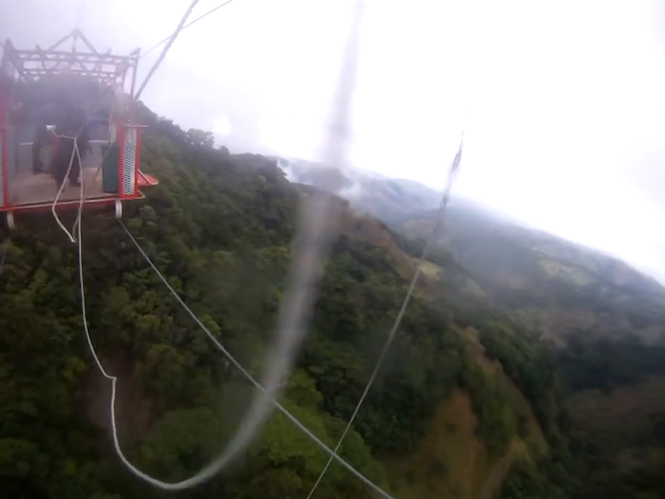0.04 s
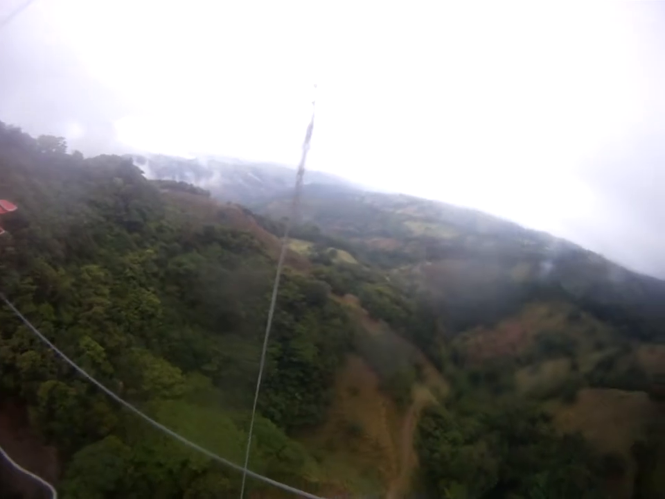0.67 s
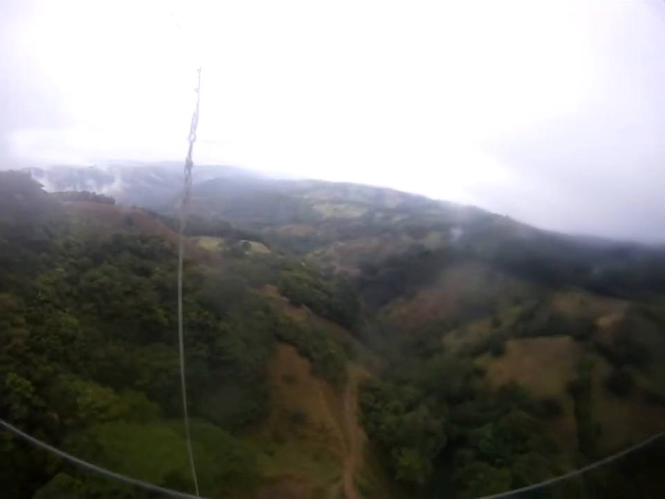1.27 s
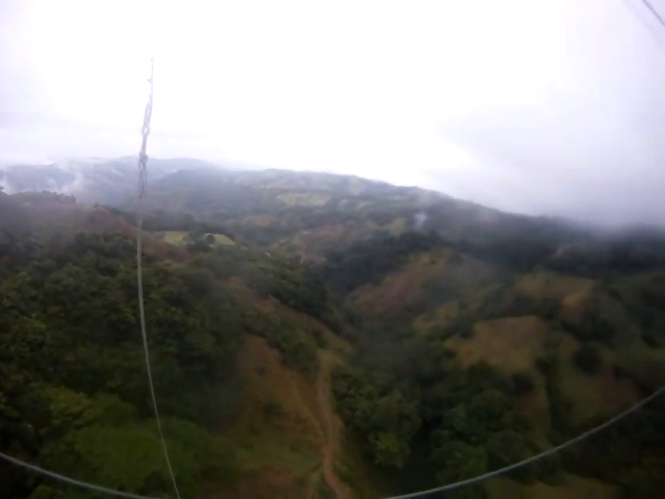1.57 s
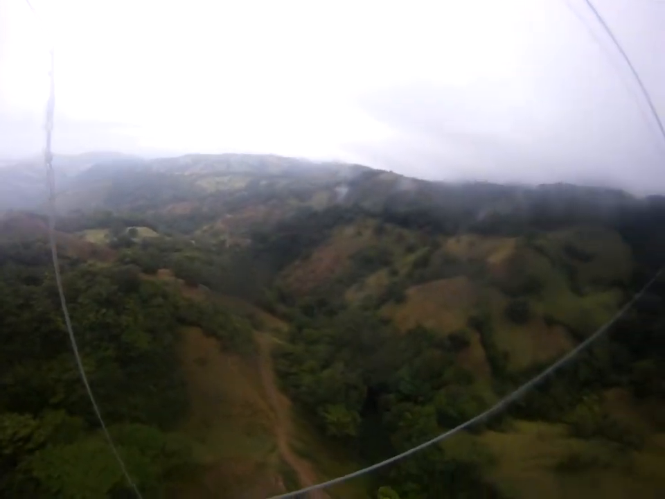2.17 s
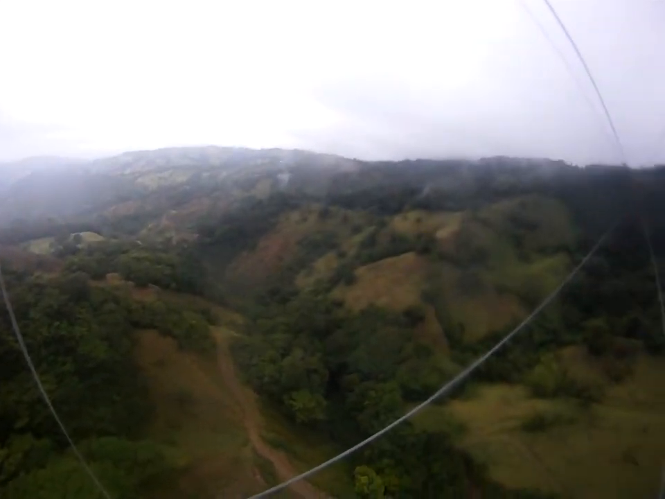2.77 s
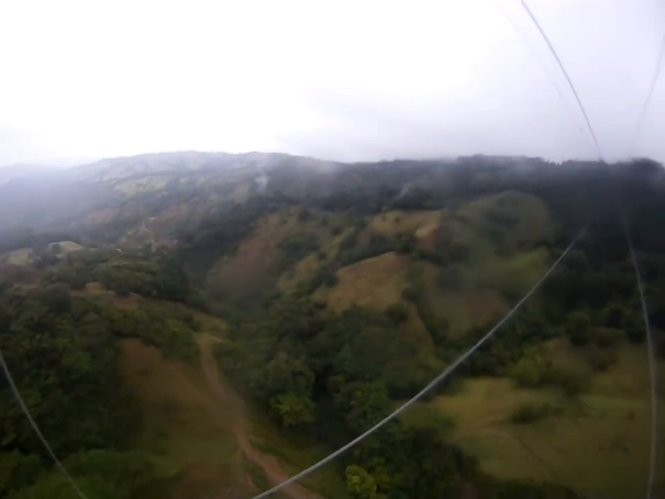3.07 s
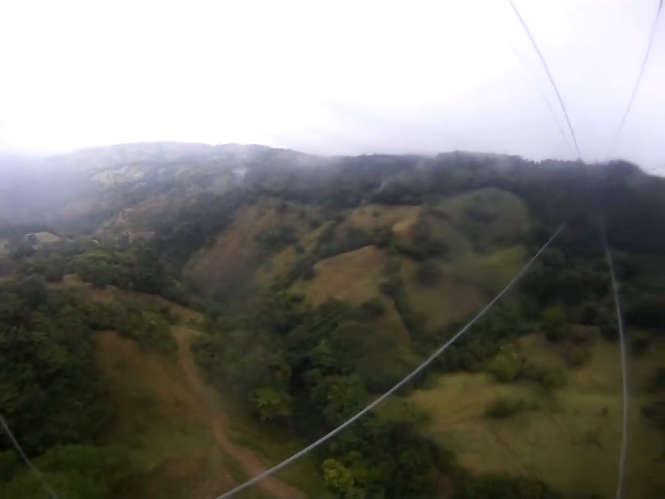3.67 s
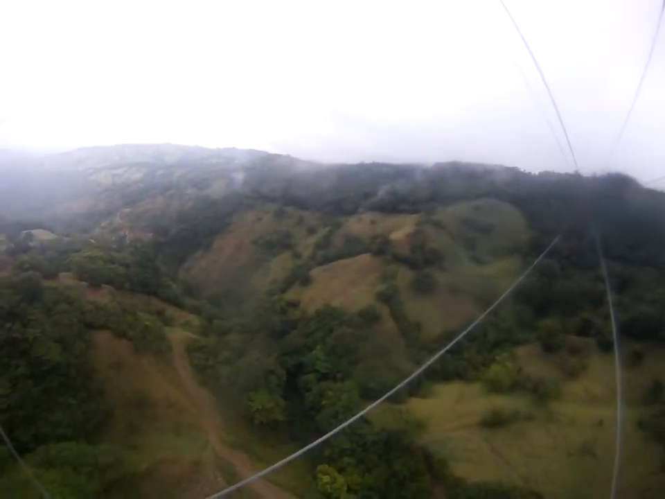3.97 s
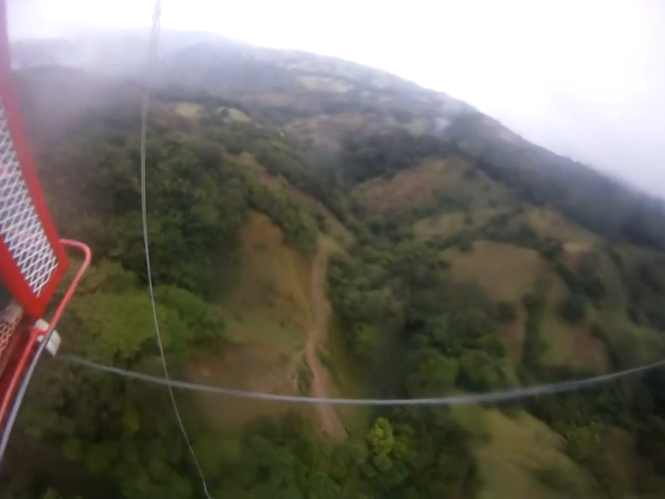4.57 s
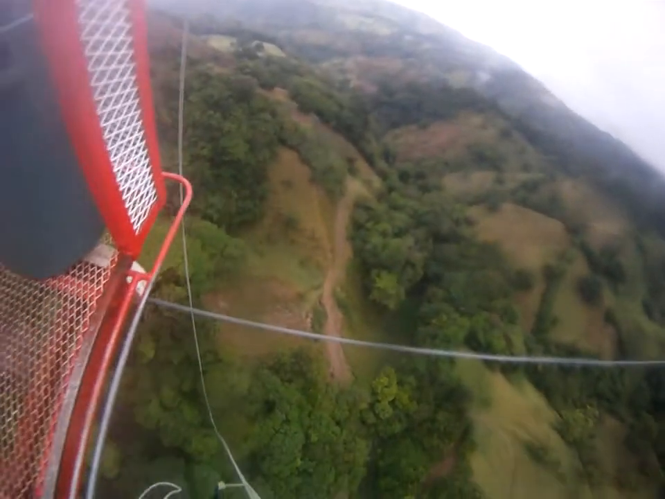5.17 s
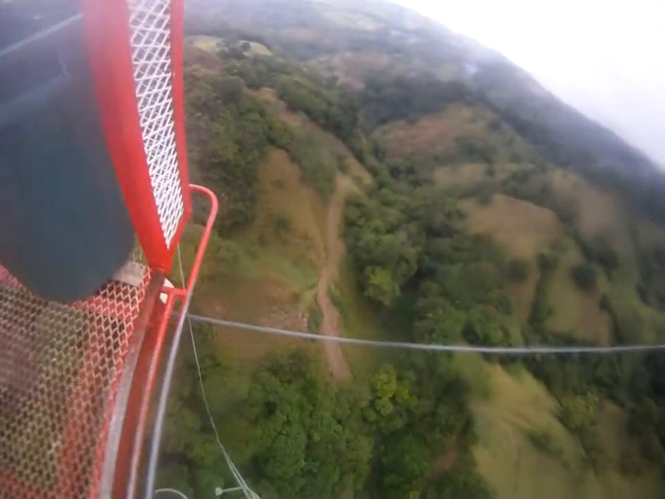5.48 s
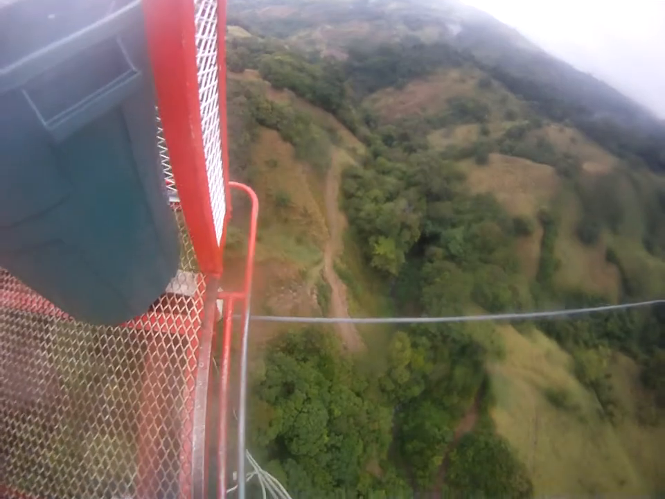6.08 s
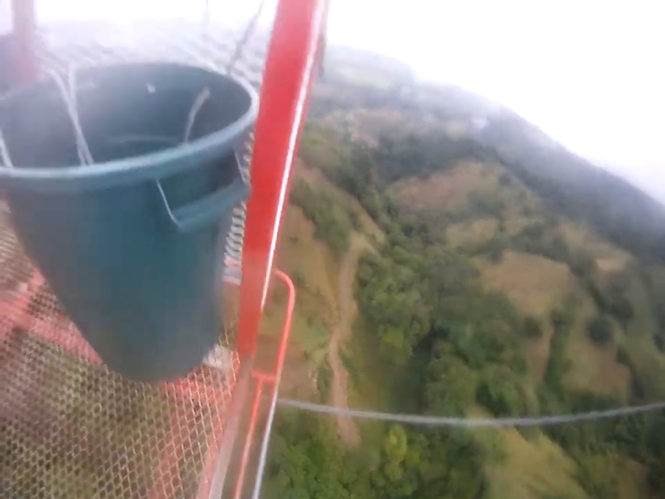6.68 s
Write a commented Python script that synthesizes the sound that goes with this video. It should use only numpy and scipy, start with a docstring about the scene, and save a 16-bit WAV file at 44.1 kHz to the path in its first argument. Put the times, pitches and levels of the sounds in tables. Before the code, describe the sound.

Wind buffets the microphone in low gusts during a high rope swing, while rope and harness tick and rasp and the camera gets knocked.

```python
"""Wind eddies buffet the microphone of a camera on a fast rope swing high over a valley.
They swell with the airspeed. The loaded rope and harness tick, then rasp in short slips,
heard through the camera's hollow case. Air hoots briefly in an edge of the case and a buckle clinks.
Blows knock the case along the way; the last one ends the ride."""
import sys
import numpy as np
from scipy import signal
from scipy.fft import rfft, irfft
from scipy.io import wavfile
from scipy.ndimage import uniform_filter1d

SR = 44100
rng = np.random.default_rng(int(sys.argv[2]) if len(sys.argv) > 2 else 0)


def bounce(signal):
    """Save signal as a 16-bit WAV file at the path given by the first command-line argument."""
    frames = np.transpose(np.atleast_2d(signal))
    limited = np.clip(frames, -1, 1)
    pcm = np.round(limited * 32767).astype(np.int16)
    wavfile.write(sys.argv[1], SR, pcm)


N = 306044
T = np.arange(N) / SR

# Levels are relative; each source adds its own gains.
# airflow force (time [s], level [dB])
WIND_LEVEL = [(0, -40), (0.3, -40.5), (0.55, -23), (1.22, -30), (1.46, -17), (2.05, -21.5), (2.5, -17.5),
              (2.9, -21.5), (3.15, -20.5), (4.05, -25.5), (4.33, -24), (4.39, -31), (4.7, -31),
              (4.87, -27.5), (5.6, -30), (6.9, -31)]
# eddy balance, deep to fine (time [s], tilt [dB/octave])
WIND_TILT = [(0, -4.5), (0.7, -5), (1.7, -0.14), (2.5, 0.1), (3.5, -0.4), (4.1, 1.4), (4.6, 1.2),
             (5.5, 1.7), (6.8, -1.7)]
# single gusts (time [s], swell [dB], half width [s], tilt change [dB/octave])
WIND_GUSTS = [(0.15, 12, 0.06, -7), (0.542, 4, 0.035, -2), (0.736, 10.5, 0.043, -4.5),
              (0.832, 7.5, 0.043, -0.5), (0.947, 4, 0.033, 2), (1.079, 11, 0.098, -1.5),
              (1.29, 9, 0.046, -1), (1.752, 3.5, 0.14, -1), (2.472, 0.5, 0.046, 0.5), (4.23, 3, 0.04, -0.5),
              (4.315, 7, 0.039, -2.5), (4.92, 3, 0.028, -1), (6.008, 10.5, 0.021, -2),
              (6.22, 7, 0.021, -3.5), (6.557, 4.5, 0.037, 3.5), (6.773, 7, 0.04, 1)]
# turbulence (frequency [Hz], density [dB])
WIND_SPECTRUM = [(12, -7), (20, -0.5), (59, 3), (111, -0.5), (169, -5), (373, -14.5), (447, -16.5),
                 (555, -23.5), (783, -46), (1050, -43), (1500, -62), (1950, -89), (3300, -120)]
# blows on the case (time [s], level [dB], pitch [Hz], t60 [s], rattle re blow [dB])
CASE_BLOWS = [(1.755, -4, 248, 0.031, -53), (2.47, -3, 190, 0.058, -53), (2.602, -7.5, 179, 0.11, -50),
              (4.196, -7.5, 185, 0.053, -52), (4.378, -24.5, 710, 0.031, 0), (5.185, -8.5, 171, 0.029, -47),
              (5.297, -18.5, 439, 0.091, -23), (5.297, -27, 804, 0.045, -24),
              (5.397, -23.5, 611, 0.045, -33), (6.923, -3, 223, 0.07, -15)]
# case rattle (frequency [Hz], density [dB])
RATTLE_SPECTRUM = [(400, 15), (900, -3.5), (1400, -6.5), (2300, 3), (3200, -2.5), (4500, -12), (6000, -20),
                   (7500, -16), (9300, -9.5), (11000, -22), (14800, -17)]
# loud rope and buckle ticks (time [s], snap [dB], body [dB])
LOUD_TICKS = [(0.0109, -43, -25.5), (0.031, -47, -24), (0.1911, -50, -24.5), (0.2188, -45, -25),
              (0.2817, -52, -22), (0.3142, -51, -29), (0.3716, -26, -21), (0.3882, -32, -27),
              (0.4508, -36, -27), (0.4678, -39, -23), (0.5893, -29, -36), (0.7717, -25.5, -36),
              (0.8895, -29, -23.5), (0.933, -21, -24), (0.9518, -25, -22.5), (0.9708, -27.5, -26),
              (1.0743, -27, -32), (1.1046, -24, -25), (1.1212, -36, -27), (1.2248, -32, -40),
              (1.285, -28, -21.5), (1.3296, -28, -30), (1.3815, -23, -23), (1.3923, -18, -24),
              (1.4048, -20, -20), (1.4475, -35, -22.5), (1.4663, -32, -25), (1.6603, -18, -34),
              (1.722, -21.5, -32), (1.7814, -28, -33.5), (1.9187, -23.5, -44), (1.9498, -22.5, -25.5),
              (1.9915, -12.5, -19), (2.0113, -25, -29), (2.0337, -30, -26.5), (2.242, -58, -24),
              (2.4826, -26.5, -24), (2.7048, -17, -27), (2.716, -19, -25), (2.9806, -21, -34),
              (3.1014, -15.5, -25), (4.1365, -18, -42), (4.516, -15.5, -46), (4.9524, -15.5, -27),
              (4.966, -21, -32)]
# rope taking up load (time [s], snap [dB], body [dB])
CREAK_LEVEL = [(0, -46, -33.5), (0.498, -40, -27.5), (0.95, -33, -32.5), (1.4, -30, -27),
               (1.56, -34, -34.5), (2, -33.5, -31), (2.6, -35.5, -32), (3.5, -27, -40)]
# strand snap (frequency [Hz], density [dB])
SNAP_SPECTRUM = [(2500, -73), (3500, -19), (4300, -1), (4800, -2), (5300, -9.5), (5900, -49), (6500, -16),
                 (7300, -4.5), (7900, -9), (8800, -54), (11000, -58)]
# hollow case (frequency [Hz], density [dB])
CASE_SPECTRUM = [(900, -14), (1800, -28), (2450, 11), (3200, -1), (3650, -4.5), (4400, -7), (5100, -7),
                 (5900, -23), (7200, -9), (8100, -15.5), (9300, -4), (10900, -32.5), (13200, -22.5),
                 (14800, -11)]
# rope slips, faint once slack (time [s], level [dB])
ROPE_SLIPS = [(3.257, -32), (3.2794, -31), (3.509, -27), (3.7957, -24.5), (3.8358, -24), (3.901, -24),
              (4.8938, -22.5), (5.0423, -32.5), (5.11, -28.5), (5.1843, -23), (5.2568, -23),
              (5.3246, -22.5), (5.3924, -28.5), (5.463, -23), (5.506, -24), (5.536, -25.5), (5.6095, -25),
              (5.634, -25), (5.6664, -28), (5.6889, -27), (5.852, -23), (5.914, -29), (6.027, -33.5),
              (6.0845, -36), (6.129, -35), (6.202, -35.5), (6.373, -36), (6.417, -35.5), (6.4703, -40),
              (6.5212, -35.5), (6.6933, -35.5), (6.7665, -36.5)]
# rubbing gear resonances (frequency [Hz], width [Hz], level [dB])
GEAR_MODES = [(2060, 78, 8.5), (2530, 66, 4), (2945, 67, 9), (9120, 120, 8)]
# rope running through gear (time [s], level [dB])
RASP_LEVEL = [(0, -53.5), (0.7, -47), (1.35, -47.5), (1.6, -51), (2.2, -47.5), (2.85, -45), (3.1, -41),
              (3.6, -47), (3.86, -41.5), (4.34, -43.5), (4.75, -44.5), (5.3, -44.5), (5.65, -41.5),
              (5.79, -36), (5.97, -51.5), (6.3, -53.5), (6.9, -55)]
# passing air (time [s], level [dB])
AIR_LEVEL = [(0, -59), (2, -58.5), (2.6, -57), (3.6, -56.5), (5.1, -56), (5.75, -51), (6.1, -61),
             (6.9, -65)]
# air and rope hiss (frequency [Hz], density [dB])
HISS_SPECTRUM = [(500, -4), (1000, -18), (1500, -9.5), (2100, 0), (2950, 0), (3550, -9), (5100, -10),
                 (5750, -25.5), (6250, -25), (6900, -13.5), (8400, -15.5), (9300, -8.5), (11000, -26),
                 (13200, -25), (14800, -12.5)]
# edge tones (time [s], pitch [Hz], level [dB], half width [s])
EDGE_HOOTS = [(5.146, 520, -27.5, 0.011), (5.587, 504, -19, 0.013)]
# buckle partials (frequency [Hz], level [dB])
BUCKLE_MODES = [(3420, -48), (8680, -54)]


def buffeting(gain_db=-1.5, gustiness_db=0.45, calm_db=-46):
    """Turbulence on the mic port: large eddies heave, small ones clump; flow sets level and tilt."""
    (level_db,), (tilt_db,) = curves(WIND_LEVEL), curves(WIND_TILT)
    for at_s, swell_db, half_s, tilt_change_db in WIND_GUSTS:
        swell = np.exp(-((T - at_s) / half_s) ** 2)
        level_db += swell_db * swell
        tilt_db += tilt_change_db * swell
    heave, rest = split(colour(rng.standard_normal(N), WIND_SPECTRUM), hz=65.0)
    rumble, rest = split(rest, hz=143.7)
    drum, eddies = split(rest, hz=307.0)
    clumps = walk(55)
    heave = steady(heave) * undb(1.8 * walk(24))
    rumble = steady(rumble * undb(2.6 * clumps)) * undb(2.4 * walk(16))
    drum = steady(drum * undb(1.5 * clumps)) * undb(2.63 * walk(12.2))
    eddies = steady(eddies * undb(2.54 * clumps + 1.94 * walk(71)))
    # four eddy sizes, about an octave apart, share the power
    shares = np.array([undb(db + octave * tilt_db) for octave, db in enumerate([-2, 0, -2, -8])])
    mix = np.sum(shares * [heave, rumble, drum, eddies], axis=0) / np.linalg.norm(shares, axis=0)
    flow = undb(gain_db + level_db + gustiness_db * walk(23))
    calm = unit(band(rng.standard_normal(N), 268, 595))
    return flow * mix + undb(calm_db) * calm


def knocks(rise_s=0.00057):
    """Each blow rings one damped mode of the mount and rattles the case."""
    out = np.zeros(N)
    rattle = unit(colour(rng.standard_normal(N), RATTLE_SPECTRUM))
    for at_s, db, hz, t60_s, rattle_db in CASE_BLOWS:
        age_s = np.maximum(T - at_s, 0)
        envelope = np.exp(-np.log(1000) * age_s / t60_s) * (1 - np.exp(-age_s / rise_s))
        out += undb(db) * envelope * np.sin(2 * np.pi * hz * age_s)
        out += rattle * bursts([at_s], [db + rattle_db], rise_s=0.0008, decay_s=0.044)
    return out


def ticks(snap_gain_db=-7, body_gain_db=-7, top_gain_db=-12, rebound_db=-12,
          rise_s=0.0005, snap_decay_s=0.0015, case_decay_s=0.0034):
    """Strands and buckles jump under load; each jump snaps and rings the case."""
    at_s, snap_db, body_db = np.vstack([LOUD_TICKS, creak()]).T
    # each settles with a weaker second jump
    at_s = np.concatenate([at_s, at_s + rng.uniform(0.004, 0.014, len(at_s))])
    snap_db = np.concatenate([snap_db, snap_db + rebound_db])
    body_db = np.concatenate([body_db, body_db + rebound_db])
    body, top = split(colour(rng.standard_normal(N), CASE_SPECTRUM), hz=6000, order=6)
    snap = colour(rng.standard_normal(N), SNAP_SPECTRUM)
    snap = steady(snap, samples=200) * bursts(at_s, snap_db + snap_gain_db, rise_s, snap_decay_s)
    body = steady(body, samples=200) * bursts(at_s, body_db + body_gain_db, rise_s, case_decay_s)
    top = steady(top, samples=200) * bursts(at_s, body_db + top_gain_db, rise_s, case_decay_s)
    mix = snap + body + top
    return mix - band(mix, 5820, 6340, order=2)  # the case absorbs this band


def creak(start_rate_hz=51.1, half_rate_s=2.3, jitter=0.35, count=130):
    """Small rope jumps, thinning as the load settles: rows of (time [s], snap [dB], body [dB])."""
    gap, size, tone = rng.standard_normal((count, 3)).T
    jumps = np.cumsum(np.exp(jitter * gap)) - 1
    at_s = half_rate_s * np.expm1(jumps / (start_rate_hz * half_rate_s))
    knots_s, snap_db, body_db = np.transpose(CREAK_LEVEL)
    snap_db = np.interp(at_s, knots_s, snap_db) + 3.3 * size + 3.1 * tone
    body_db = np.interp(at_s, knots_s, body_db) + 1.7 * size
    return np.column_stack([at_s, snap_db, body_db])[at_s < knots_s[-1]]


def slips(gain_db=-6, grain_db=3):
    """Rope sticks and lets go in gritty scrapes that ring the gear."""
    at_s, level_db = np.transpose(ROPE_SLIPS)
    grit = colour(rng.standard_normal(N) * undb(grain_db * walk(380)), HISS_SPECTRUM)
    ring = sum(undb(db) * band(grit, hz - width_hz / 2, hz + width_hz / 2, order=1)
               for hz, width_hz, db in GEAR_MODES)
    envelope = bursts(at_s, level_db + gain_db, rise_s=0.00063, decay_s=0.014)
    return steady(grit + ring, samples=800) * envelope


def rasp(grain_db=1.5, flutter_db=1.89, air_gain_db=-1, body_gain_db=-1, treble_gain_db=-9):
    """Rope fibres drag through the gear in rushing air: a grainy, fluttering hiss."""
    (rasp_db,), (air_db,) = curves(RASP_LEVEL), curves(AIR_LEVEL)
    chatter_db = np.exp(-T / 4.1) * (walk(97) - 1)  # fades as the rope takes up load
    fibres = rng.standard_normal(N) * undb(grain_db * walk(230) + flutter_db * walk(31) + chatter_db)
    rest, treble = split(colour(fibres, HISS_SPECTRUM), hz=4700)
    air, body = split(rest, hz=1320, order=5)
    air *= undb(air_gain_db) / band(air, 850, 1700).std()
    body *= undb(body_gain_db) / band(body, 1900, 3500).std()
    treble *= undb(treble_gain_db) / band(treble, 6500, 10000).std()
    return undb(air_db) * air + undb(rasp_db) * (body + treble)


def hoots():
    """Flow across an edge briefly locks onto a cavity: a soft, wavering note."""
    out = np.zeros(N)
    waver = 1 + 0.016 * walk(43)
    for at_s, hz, db, half_s in EDGE_HOOTS:
        out += undb(db) * np.exp(-((T - at_s) / half_s) ** 2) * sine(hz * waver)
    return out


def sizzle(drive, centre_hz=12000, gain_db=-24):
    """Thin, high sizzle that flutters in step with the driving sound."""
    return undb(gain_db) * band(drive, 156, 1300, order=1) * np.cos(2 * np.pi * centre_hz * T)


def clink(at_s=6.319):
    """A small buckle rings faintly."""
    ring = sum(undb(db) * sine(hz * (1 + 0.0043 * walk(80))) for hz, db in BUCKLE_MODES)
    return ring * bursts([at_s], [0], rise_s=0.003, decay_s=0.022)


def undb(db):
    """Decibels to gain."""
    return 10 ** (np.asarray(db) / 20)


def unit(x):
    """Scale to rms 1."""
    return x / np.sqrt(np.mean(x ** 2))


def sine(hz):
    """Sine with per-sample frequency."""
    return np.sin(2 * np.pi * np.cumsum(hz) / SR)


def curves(table):
    """Per-sample values of each control column."""
    knots_s, *columns = np.transpose(table)
    return [np.interp(T, knots_s, column) for column in columns]


def band(x, lo_hz, hi_hz, order=4):
    """Zero-phase band-pass."""
    return signal.sosfiltfilt(signal.butter(order, [lo_hz, hi_hz], "band", fs=SR, output="sos"), x)


def split(x, hz, order=3):
    """Complementary low and high parts."""
    low = signal.sosfiltfilt(signal.butter(order, hz, fs=SR, output="sos"), x)
    return low, x - low


def colour(x, spectrum):
    """Filter by rows of (frequency [Hz], gain [dB])."""
    hz, db = np.transpose(spectrum)
    bins_hz = np.maximum(np.arange(N // 2 + 1) * SR / N, 1)
    return irfft(rfft(x) * undb(np.interp(np.log(bins_hz), np.log(hz), db)), N)


def walk(cutoff_hz):
    """Smooth random wander, rms 1."""
    bins_hz = np.arange(N // 2 + 1) * SR / N
    return unit(irfft(rfft(rng.standard_normal(N)) / (1 + (bins_hz / cutoff_hz) ** 4), N))


def steady(x, samples=4400):
    """Hold short-term rms at 1."""
    return x / np.sqrt(uniform_filter1d(uniform_filter1d(x ** 2, samples), samples // 2) + 1e-18)


def bursts(times_s, peaks_db, rise_s, decay_s):
    """Rise-and-decay contact envelopes, summed in power."""
    power, age_s = np.zeros(N + SR), np.arange(SR // 5) / SR
    shape = (1 - np.exp(-age_s / rise_s)) * np.exp(-age_s / decay_s)
    for at_s, gain in zip(times_s, undb(peaks_db)):
        start = max(int(at_s * SR), 0)
        power[start:start + len(shape)] += (gain * shape / shape.max()) ** 2
    return np.sqrt(power[:N])


def scene():
    """Wind and rigging, close to one microphone."""
    low = buffeting() + knocks() + hoots()
    return (low + sizzle(low) + rasp() + ticks() + slips() + clink())[None]


def record(dry):
    """The camera rounds the peaks and cuts the top steeply."""
    ceiling, cutoff_hz = 0.85, 15250
    rounded = dry / (1 + (dry / ceiling) ** 4) ** 0.25
    return signal.sosfilt(signal.ellip(10, 0.2, 80, cutoff_hz, fs=SR, output="sos"), rounded)


dry = scene()
out = record(dry)
bounce(out)
```